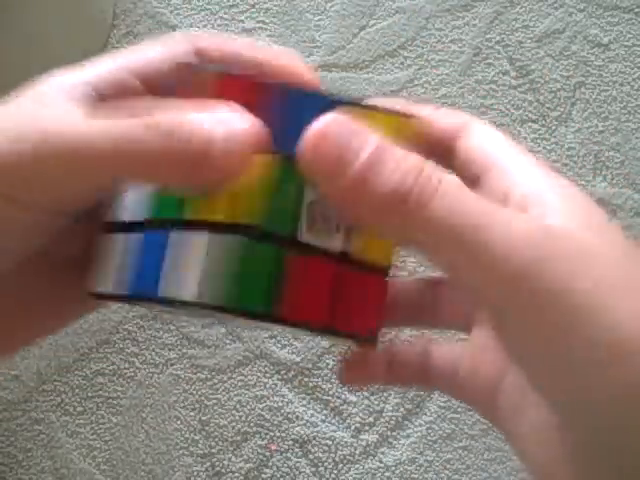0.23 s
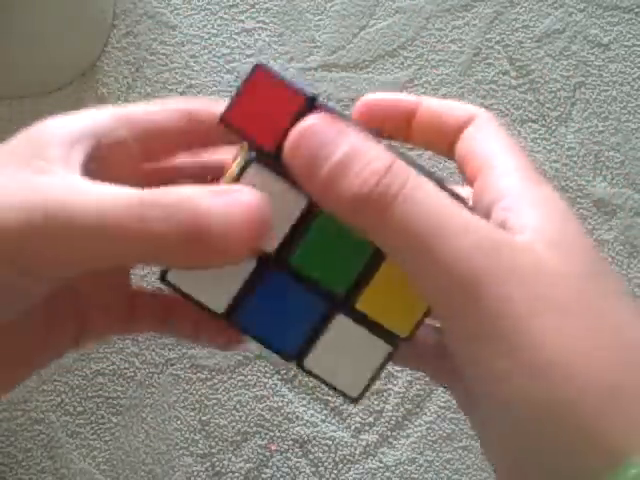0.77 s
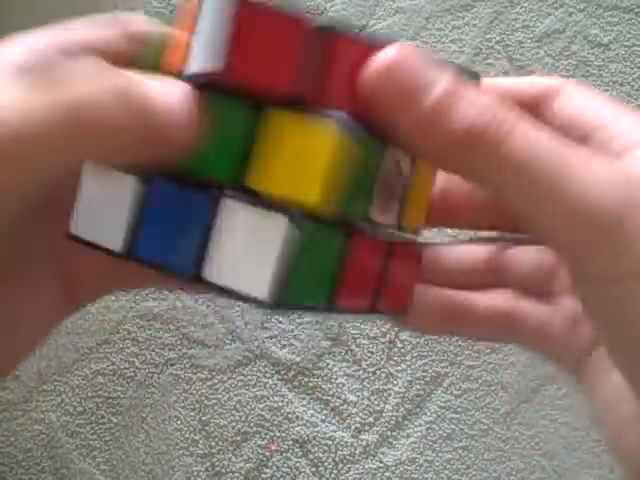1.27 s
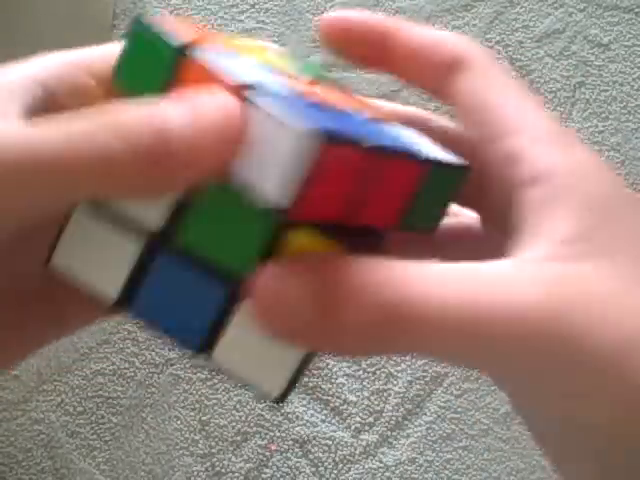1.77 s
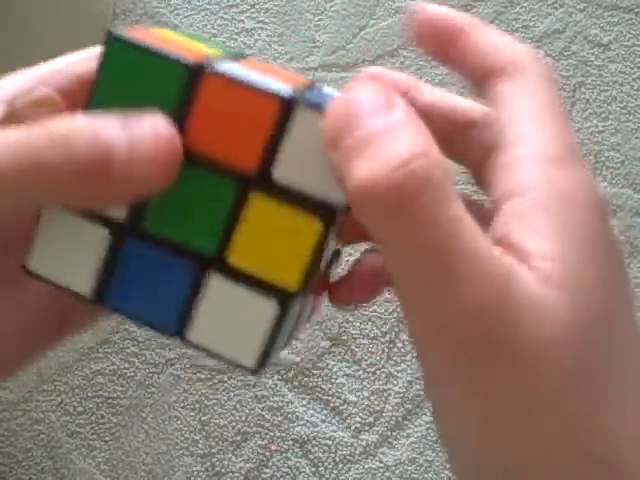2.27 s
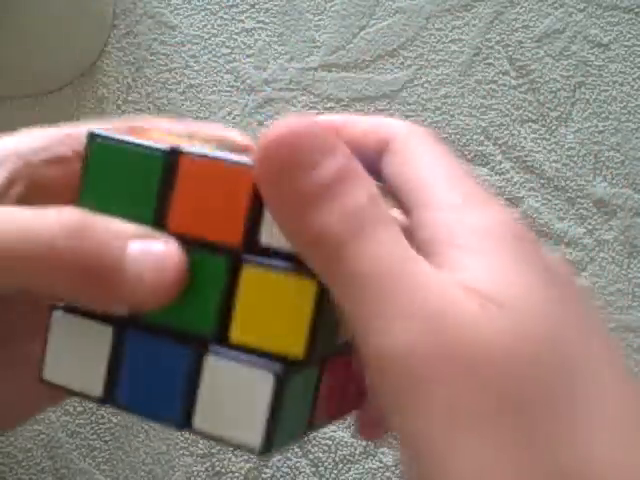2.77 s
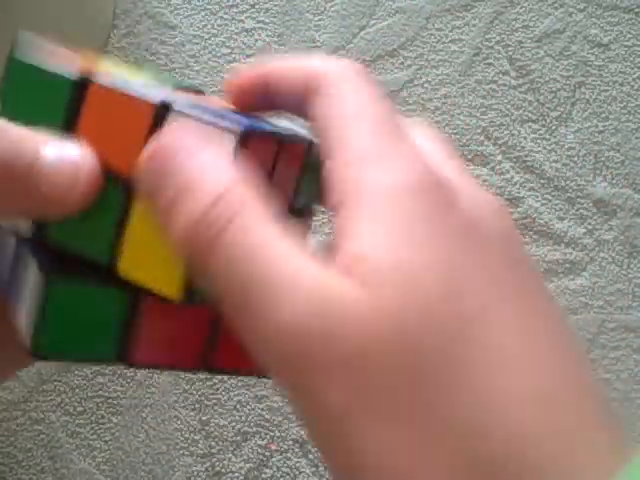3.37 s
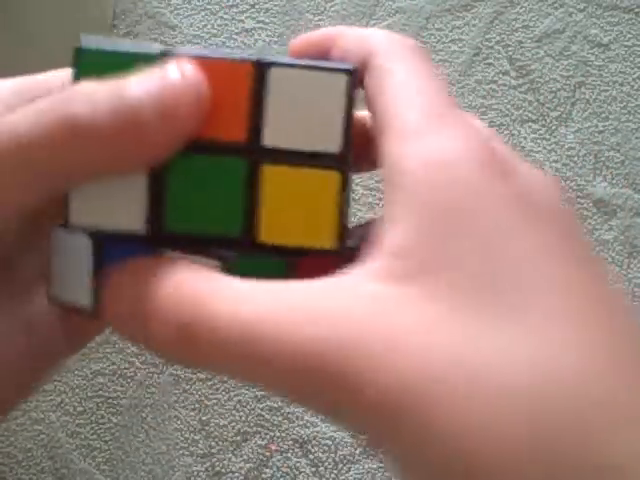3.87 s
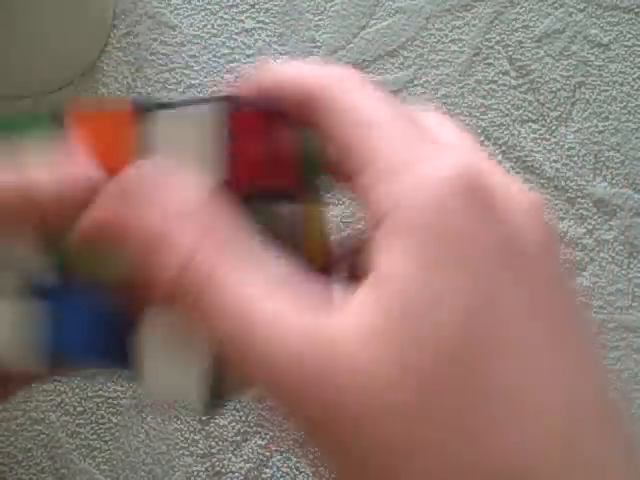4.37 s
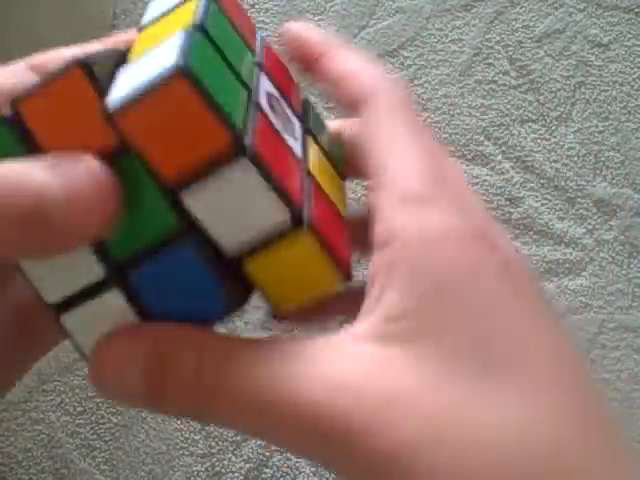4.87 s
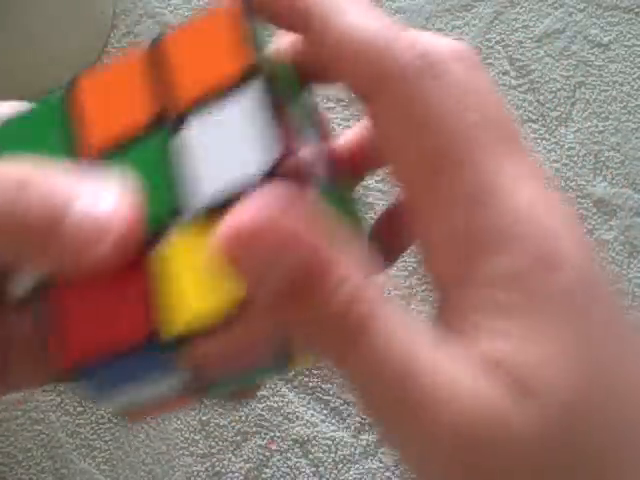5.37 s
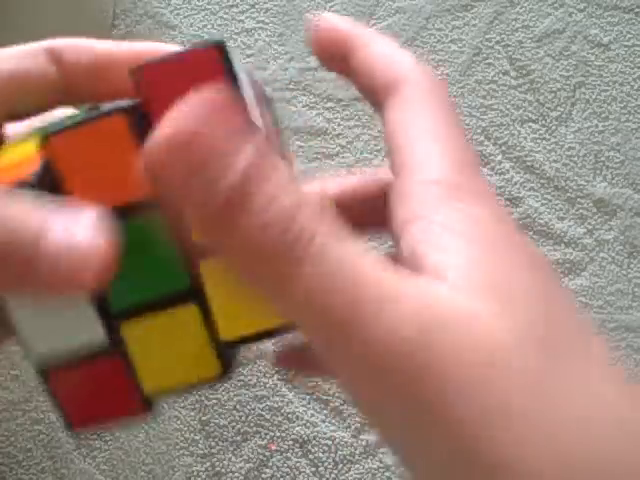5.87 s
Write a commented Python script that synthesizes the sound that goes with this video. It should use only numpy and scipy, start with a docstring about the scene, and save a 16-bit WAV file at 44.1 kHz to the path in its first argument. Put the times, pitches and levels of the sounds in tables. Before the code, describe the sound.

A plastic puzzle cube is twisted by hand close to a small microphone, with a soft room echo and a quiet, steady rumble and hiss. From the start, the layers scrape briefly and the hollow pieces click and clack in quick, uneven clusters. Between about 0.3 and 2.3 seconds there are faint, short high rings, probably from the springs, and a tiny squeak near 1 second. Busier runs of clicks come around 1.3 and 2.5 seconds. Pieces snap into place loudest at about 3.3, 4.6 and 5 seconds, with lighter clicking and scraping between. Just after 5 seconds, a faint, deep puff of air brushes the microphone. Another turn clatters near 5.7 seconds, and a few light clicks follow at about 6 seconds.

```python
"""Hands twist a plastic puzzle cube close to a small microphone, over a low rumble and hiss.
From the start, layers scrape as they turn and hollow pieces knock; the room answers softly.
From 0.3 s to about 2.3 s come high rings, likely the springs, and a short squeak near 0.95 s.
Pieces snap into place loudest near 3.3, 4.6 and 5 s. Just after that, stirred air brushes
the microphone, and a last turn clatters near 5.7 s."""
import sys
import numpy as np
from scipy import signal
from scipy.fft import rfft, irfft
from scipy.io import wavfile
from scipy.ndimage import uniform_filter1d

SR = 44100
rng = np.random.default_rng(int(sys.argv[2]) if len(sys.argv) > 2 else 0)


def transcribe(u):
    """Save the signal u as a 16-bit wav file named by the first command-line argument.

    u: samples, shape (n,) or (channels, n), limited to [-1, 1]; the rate is SR.
    q: integer samples, one column per channel.
    """
    v = np.clip(np.atleast_2d(u).T, -1, 1)
    q = np.round(v * 32767).astype(np.int16)
    wavfile.write(sys.argv[1], SR, q)


N = 269451

# how strong the steady background is at each pitch: pitch_hz, relative_db
BACKGROUND = [(12, -29), (20, 1.5), (77, 5), (189, -5), (244, -3), (305, -9), (690, -16.5),
              (1240, -22.5), (1900, -23.5), (3420, -26), (15200, -34), (16500, -54)]
# layers sliding round: start_s, end_s, first_db, last_db, sharp_db (added to those levels)
SCRAPES = [(0, 0.087, -44.5, -48, -12.5), (0.47, 0.57, -89, -74, -1), (0.921, 0.989, -65, -39.5, -12),
           (1.038, 1.27, -79, -74, -14), (1.251, 1.348, -62, -39, -10), (1.354, 1.447, -77, -73, 0),
           (2.168, 2.264, -63, -46.5, -10.5), (2.426, 2.554, -55, -73, -18),
           (2.585, 2.796, -80, -66.5, -16), (2.895, 2.983, -60.5, -53.5, -24),
           (3.244, 3.257, -50, -43.5, -2.5), (3.265, 3.429, -61, -57.5, -9.5), (3.928, 4.111, -61, -70, -6),
           (4.182, 4.34, -64.5, -75.5, -17), (4.406, 4.517, -43.5, -51, -9.5),
           (4.548, 4.659, -50, -45.5, -7.5), (4.977, 5.041, -65, -30.5, -12), (5.65, 5.703, -61, -49, -9),
           (5.72, 5.797, -32.5, -63, -12), (6.028, 6.104, -68, -61, -4)]
# the modes (natural ringing pitches) of the hollow pieces: pitch_hz, width_hz, level_db
PIECE_MODES = [(320, 210, 0), (888, 277, 10.5), (1160, 1340, 3), (1300, 110, 15), (2020, 3100, 23.5),
               (3500, 240, -1), (3500, 2200, 1), (4630, 2500, 10.5), (5080, 540, 5), (6850, 820, -1.5),
               (9000, 630, 5), (9400, 420, 5.5), (12100, 880, -1.5), (12030, 1100, -3), (15700, 1500, -7)]
# piece hitting piece: start_s, clack_db, hollow_db, sharp_db (both added to clack_db), edge_pitch_hz
KNOCKS = [(0.0036, -24, -20.5, 0, 6440), (0.0088, -19.5, -5.5, 3.5, 3650), (0.022, -41, 7, 1, 3500),
          (0.039, -33.5, 1, -14.5, 3600), (0.0534, -23.5, 1.5, -2.5, 3500), (0.17, -51.5, -10, -2, 4970),
          (0.225, -38.5, -9, -6, 9700), (0.3168, -22.5, -17, -4.5, 3700), (0.444, -55, -0.5, 1, 3620),
          (0.499, -47, -12, -34, 3300), (0.557, -64.5, 10, -19, 3300), (0.566, -57.5, -9, -13, 12000),
          (0.577, -62, -12, -14, 3300), (0.65, -63, -15, -20, 3330), (0.659, -57, -20, 8, 8550),
          (0.6877, -44.5, -21.5, -25.5, 3300), (0.6952, -50, -35, -28, 3300), (0.722, -63, -14, 3, 8000),
          (0.731, -47.5, -33, -5, 5800), (0.8401, -38.5, -34, -6, 4460), (0.9225, -45.5, -13, -2, 5970),
          (0.938, -51, -2, 9, 4120), (0.973, -38.5, 10, 9, 4440), (0.9828, -33, -17.5, -21, 3800),
          (1.0723, -44.5, -13, -15, 3420), (1.102, -53.5, -7, -25, 3400), (1.1247, -44.5, -10, -10.5, 3500),
          (1.1434, -50.5, -24, -18, 3300), (1.1715, -39.5, -4, -3, 4800), (1.2192, -45, -11, -18, 3300),
          (1.239, -54.5, 6, -3, 6700), (1.2688, -35.5, -12, -8, 3300), (1.281, -30.5, -1.5, -9.5, 6960),
          (1.3014, -43.5, -2, 7.5, 7000), (1.314, -43, 2, -3, 4500), (1.328, -22.5, -3.5, 3, 7600),
          (1.3438, -35, 1, -9.5, 4500), (1.378, -41, 3, -7, 4500), (1.3823, -35, -0.5, -2, 4830),
          (1.4024, -44, 0, 3, 4000), (1.4194, -32, -21, 6.5, 8440), (1.4297, -28.5, -4, 12.5, 3800),
          (1.5167, -48.5, 4, 1.5, 6700), (1.5412, -36.5, -13.5, -1, 4140), (1.742, -46.5, -4, -14, 4040),
          (1.762, -65, -14, 11, 5000), (1.9421, -44.5, -5, 4, 3880), (1.979, -42.5, -13, 2, 4260),
          (2.0858, -31, -18.5, 4.5, 3700), (2.1705, -29, -24, -2.5, 4340), (2.199, -50, 3.5, -15, 5400),
          (2.2194, -50.5, 7, 11, 7100), (2.2352, -42.5, 3, 3, 4940), (2.2426, -33.5, -2, -2, 4870),
          (2.253, -36, -12, -11, 4400), (2.3137, -38, -30, -4, 5800), (2.354, -47, -13, 4.5, 7350),
          (2.437, -42, 0, -3, 3300), (2.441, -38, 2, -4.5, 3600), (2.454, -48, -11, -2, 4500),
          (2.481, -39.5, -6, -2, 4500), (2.497, -19, -20, -7, 6500), (2.5169, -47.5, 13, -11, 3300),
          (2.5294, -26.5, -6.5, 3, 3100), (2.5909, -36, 2.5, -4.5, 4730), (2.61, -56, -6, 4, 8050),
          (2.628, -42, -14, -11, 3770), (2.675, -47, 2, 0, 4500), (2.7337, -56.5, 4.5, -20, 4200),
          (2.7531, -44.5, -2, -13.5, 3800), (2.757, -42.5, -2, -32, 3300),
          (2.7713, -39.5, -11.5, -12.5, 3340), (2.8157, -43, 2, -7, 3400),
          (2.8981, -41.5, -13.5, 3.5, 5200), (2.9218, -32, -13.5, -5, 7500), (2.935, -45.5, -2, -4, 3900),
          (2.96, -36, -10, -4, 3300), (3.0158, -36, -10, -6.5, 4650), (3.142, -54.5, -6, -8.5, 3800),
          (3.227, -42, -5, -2.5, 3900), (3.2537, -4.5, -29, -5.5, 7600), (3.274, -36.5, -9, 5.5, 3900),
          (3.314, -39.5, -6, 5, 9400), (3.334, -35, -3, -8, 3400), (3.3729, -39, -8, -0.5, 4600),
          (3.383, -30, -13, 3.5, 3280), (3.3874, -21.5, -35, -14, 3700), (3.4185, -32.5, -9, -0.5, 7850),
          (3.438, -29, -3.5, 5, 4500), (3.4525, -47, 6, -8, 3500), (3.472, -39.5, -23, -13.5, 5100),
          (3.5443, -34.5, -6.5, -2, 3800), (3.8024, -49, -7, -27, 3220), (3.816, -61, 2, -16, 3500),
          (3.8388, -44, -1.5, -1, 7020), (3.9293, -43, 1, 3, 5640), (3.963, -48.5, 8, -13, 4400),
          (4.0118, -52.5, -1, -18, 3300), (4.0413, -54, 6.5, -21, 3230), (4.188, -40, -4, 0.5, 5880),
          (4.2025, -40.5, 1, -7, 3290), (4.223, -38.5, -5.5, -10.5, 3300), (4.241, -48, -5.5, -10.5, 3360),
          (4.2665, -44, -3, -3, 3400), (4.2841, -41.5, -1, -11, 4800), (4.302, -37.5, -8.5, -13.5, 3500),
          (4.3153, -49, 4.5, -10, 3330), (4.408, -32, -3.5, -6.5, 3340), (4.4204, -27, -6, 5, 12200),
          (4.433, -31.5, 1, -3, 4500), (4.4456, -26.5, -8.5, -5.5, 4100), (4.4775, -37, -3, 0, 7100),
          (4.4883, -28, -5.5, -13.5, 4830), (4.552, -49, -4.5, -3, 4500), (4.568, -21.5, 5, -4, 6740),
          (4.59, -40, 1.5, 0.5, 5230), (4.6002, -23, -6.5, -4.5, 5970), (4.6021, -7, -9.5, 0.5, 6000),
          (4.62, -25.5, -4.5, 1, 3700), (4.6235, -15.5, -17.5, -6.5, 4500), (4.627, -23.5, -6, -1, 5440),
          (4.6365, -25, -3.5, -3.5, 7550), (4.646, -35.5, -9, 1, 4000), (4.709, -43.5, 5.5, -5, 11900),
          (4.794, -37, -20.5, 1, 4500), (4.912, -54, -1.5, -8, 3280), (4.922, -55.5, 0.5, -7.5, 3500),
          (4.9582, -37.5, 0, 1.5, 3800), (4.962, -42.5, -5, 0, 3500), (4.9868, -31.5, -5, -7, 7650),
          (5.01, -22.5, -8.5, 4, 3230), (5.018, -12, -6, 3.5, 3420), (5.0358, -22.5, -16.5, -12.5, 3280),
          (5.185, -47, 0.5, 15.5, 8600), (5.2664, -54, -18, -23, 9030), (5.299, -63.5, -10, 3, 8000),
          (5.392, -48, -8, -6, 3500), (5.398, -35.5, -16, 0.5, 3500), (5.42, -63, -14, -2, 7020),
          (5.592, -68, -15, 12, 8000), (5.606, -53.5, -2, 0.5, 4000), (5.6513, -45, 6.5, 4, 7250),
          (5.667, -57.5, 19, -18, 4200), (5.6795, -47, 7, -9, 3300), (5.6867, -48.5, 15, -9, 3300),
          (5.7033, -30, -3, -3, 4600), (5.709, -25.5, -32, 1.5, 6340), (5.7248, -26, -15, -1, 3080),
          (5.741, -36, -3, 3, 13400), (5.756, -39, -23, -8, 3300), (5.7605, -35.5, -14, 0, 3300),
          (5.7671, -28.5, -6.5, -7, 6800), (5.7805, -38.5, 0, -6, 4300), (5.855, -43.5, -9, -4, 3280),
          (5.928, -50, -29, -19, 3300), (6.0224, -37.5, -8, -15, 3350), (6.071, -41, -12.5, -30.5, 3320),
          (6.083, -47.5, 4.5, -7, 5540)]
# the room's echoes: pitch_hz, fade_s (time to fall 60 dB), relative_db
ECHOES = [(250, 0.7, 1.5), (1490, 0.31, -1), (5000, 0.26, -2), (14000, 0.16, -4)]
# thin tones: a short squeak near 0.95 s, and high rings, likely the springs:
# start_s, pitch_hz, level_db, fade_s (time to fall 60 dB)
THIN_TONES = [(.32, 5180, -51.5, 0.16), (0.944, 2710, -46, 0.044), (0.949, 7040, -48, 0.064),
              (.985, 5170, -45, 0.11), (1.268, 5120, -52, .06), (1.272, 7300, -52, 0.087),
              (1.435, 8500, -57, 0.071), (2.18, 5200, -57, 0.091), (2.18, 7150, -52, 0.046),
              (2.18, 10400, -60, 0.038), (2.235, 5010, -45, 0.047), (2.25, 5100, -60, 0.099),
              (2.25, 4540, -60, 0.13)]
# air stirred past the microphone: time_s, level_db
DRAUGHT = [(4.95, -65), (5.124, -44), (5.45, -83)]
# where a tap's five parts (thud, hollow, clack, snap, tick) meet: border_hz
PART_BORDERS = [500, 1300, 3200, 7500]

TAP_SAMPLES, LEAD_SAMPLES = 2048, 128  # length of one tap; the quiet at its front
TAP_HZ = np.fft.rfftfreq(TAP_SAMPLES, 1 / SR)  # the pitches in a tap's spectrum


def undb(db):
    """Turn decibels into a number to multiply by."""
    return 10 ** (np.asarray(db) / 20)


def unit(x):
    """Scale a sound so its average strength (rms) is 1."""
    return x / np.sqrt(np.mean(x ** 2))


def band(x, low_hz, high_hz):
    """Keep the pitches between two limits."""
    return signal.sosfilt(signal.butter(2, [low_hz, high_hz], "band", fs=SR, output="sos"), x)


def place(sounds, starts_s):
    """Lay short sounds on the time line."""
    out = np.zeros(N + sounds.shape[1])
    for sound, start_s in zip(sounds, starts_s):
        first = int(start_s * SR)
        out[first:first + len(sound)] += sound
    return out[:N]


def resonance(hz, width_hz):
    """Spectrum of something that rings most strongly at one pitch."""
    return 1j * TAP_HZ * width_hz / (hz ** 2 - TAP_HZ ** 2 + 1j * TAP_HZ * width_hz)


def background():
    """Low rumble and microphone hiss: steady noise, strongest in the bass."""
    hz, db = np.transpose(BACKGROUND)
    pitches = np.fft.rfftfreq(N, 1 / SR) + 1
    colour = undb(np.interp(np.log(pitches), np.log(hz), db))
    return unit(irfft(rfft(rng.standard_normal(N)) * colour, N)) * undb(-58)


def piece_rings(count, detune, scatter_db):
    """Spectra of a tap's five parts, low to high; each tapped piece can be tuned a little apart."""
    centre, width, db = np.transpose(PIECE_MODES)[:, :, None]
    width = np.maximum(width, centre / 8)  # plastic in the hand never rings long
    chance = rng.standard_normal((count, 2, len(PIECE_MODES), 1))
    hz = centre * (1 + detune * chance[:, 0])
    sign = (-1.) ** np.arange(len(PIECE_MODES))[:, None]  # neighbouring modes push out and in by turns
    modes = sign * undb(db + scatter_db * chance[:, 1]) * resonance(hz, width)
    modes *= (1j * TAP_HZ / (hz * .5 + 1j * TAP_HZ)) ** 2  # small pieces give off little bass
    modes *= hz * 2 / (hz * 2 + 1j * TAP_HZ)  # a soft contact passes little treble
    part = np.digitize(centre[:, 0], PART_BORDERS)
    return [modes[:, part == k].sum(axis=1) for k in range(len(PART_BORDERS) + 1)]


def scrapes():
    """Plastic faces stick and slip: tiny uneven taps ring the pieces, over a smooth high rub."""
    t, level, sharp_level = np.arange(N) / SR, np.zeros(N), np.zeros(N)
    for start_s, end_s, first_db, last_db, sharp_db in SCRAPES:
        on = (t >= start_s) & (t < end_s)
        gain = undb(np.interp(t[on], [start_s, end_s], [first_db, last_db]))
        level[on] += gain
        sharp_level[on] += gain * undb(sharp_db)
    grip_db = 8.7 * np.minimum(rng.exponential(size=N // 96 + 1), 2.7)  # a new grip about every 2 ms
    taps = rng.standard_normal(N) * uniform_filter1d(undb(grip_db).repeat(96)[:N], size=32)
    rings = piece_rings(1, detune=0, scatter_db=0)
    _, hollow, clack, snap, tick = (unit(signal.fftconvolve(taps, irfft(r[0]))[:N]) for r in rings)
    rub = unit(band(rng.standard_normal(N), 4100, 11000))
    body = uniform_filter1d(level, size=256) * (clack + undb(-1.5) * hollow + undb(-10.5) * snap)
    return body + uniform_filter1d(sharp_level, size=256) * (tick + undb(-2) * rub)


def rattles(hollow_db, sharp_db):
    """Spectrum of the contacts inside each knock: a tiny rattle that builds and fades."""
    # flat faces meeting sound hollow and rattle longer than a corner catching
    rattle_ms = 0.72 * np.exp(0.012 * hollow_db - 0.02 * sharp_db)
    time_ms = np.maximum(np.arange(TAP_SAMPLES // 2) - LEAD_SAMPLES, 0) / SR * 1000
    age = time_ms / rattle_ms
    contacts = rng.standard_normal(age.shape)
    firm = np.diff(np.sign(age - 1), append=1) > 0  # one firm contact as age passes 1
    contacts[:, LEAD_SAMPLES:] += 3.55 * firm[:, LEAD_SAMPLES:]
    spiky = contacts * np.abs(contacts) ** .5
    spectrum = rfft(spiky * age ** 1.71 * np.exp(-age), TAP_SAMPLES)
    # hard, brief contacts push all pitches alike, so even out the spectrum
    return spectrum / np.sqrt(uniform_filter1d(np.abs(spectrum) ** 2, size=27))


def knocks():
    """Rattles set the pieces ringing. Gives the sound at the microphone and the sound sent all round."""
    start_s, clack_db, hollow_db, sharp_db, edge_hz = np.transpose(KNOCKS)[:, :, None]
    rattle = rattles(hollow_db, sharp_db)
    thud, hollow, clack, snap, tick = piece_rings(len(KNOCKS), detune=.02, scatter_db=2.0)
    strength = lambda ring: np.sqrt(np.mean(np.abs(ring) ** 2, axis=1, keepdims=True))
    sharp = snap / strength(snap) + undb(-5) * tick / strength(tick)
    clack = clack / (1 + 1j * TAP_HZ / 5000) ** 2  # fades above 5000 Hz
    light_touch_db, thud_db = -32, -22.5  # the whole cube thuds in the hands, softer than the clack
    # blows harder than a light touch shake more pieces
    force_db = np.maximum(clack_db + np.maximum(sharp_db, 0) - light_touch_db, 0)
    other_modes = undb(-10 + 0.4 * force_db)
    edge = other_modes + resonance(edge_hz, 0.28 * edge_hz)
    # the air space in the struck piece rings lower for hollower knocks
    cavity_hz = 1648 * np.exp(-0.0083 * hollow_db + 0.065 * rng.standard_normal(start_s.shape))
    cavity = other_modes + resonance(cavity_hz, 0.3 * cavity_hz)
    heard = []
    # the microphone faces one cavity and edge; the walls hear all sides of the cube at once
    for rings in ((thud, hollow, clack * cavity, sharp * edge), (thud, hollow, clack, sharp)):
        sound = 0
        for ring, db in zip(rings, (thud_db, hollow_db, 0, sharp_db)):
            part = irfft(ring * rattle)
            peak = np.sqrt(2 * uniform_filter1d(part ** 2, size=64).max(axis=1, keepdims=True))
            sound = sound + undb(clack_db + db) * part / peak
        heard.append(place(sound, np.maximum(start_s[:, 0] - LEAD_SAMPLES / SR, 0)))
    return heard


def room(x):
    """The walls send back dense, soft echoes; each octave dies away at its own rate."""
    t = np.arange(SR // 2) / SR
    hz, fades, levels = np.transpose(ECHOES)
    tail = 0
    for low_hz in 125 * 2. ** np.arange(7):
        middle_hz = np.sqrt(2) * low_hz
        fade_s, db = (np.interp(np.log(middle_hz), np.log(hz), column) for column in (fades, levels))
        tail = tail + band(rng.standard_normal(len(t)), low_hz, 2 * low_hz) * undb(db - 60 * t / fade_s)
    tail *= np.clip(t / 0.0035, 0, 1) ** 2  # echoes gather over the first 3.5 ms
    return signal.fftconvolve(x, tail / np.sqrt(np.sum(tail ** 2)))[:N] * undb(-18.5)


def thin_tones():
    """A short squeak, and high rings, likely the springs; each rises fast, wavers and soon dies."""
    start_s, hz, db, fade_s = np.transpose(THIN_TONES)[:, :, None]
    t = np.arange(SR // 2) / SR
    waver = unit(uniform_filter1d(rng.standard_normal((len(THIN_TONES), len(t))), size=200))
    tone = np.sin(2 * np.pi * hz * t + 0.3 * waver)
    rise = 1 - np.exp(-t / 0.00071)
    fall = undb(db - 60 * (t / fade_s) ** 2)
    return place(tone * rise * fall, start_s[:, 0])


def draught():
    """Air stirred past the microphone makes a brief swell in the deep bass."""
    time_s, db = np.transpose(DRAUGHT)
    swell = undb(np.interp(np.arange(N) / SR, time_s, db))
    return unit(band(rng.standard_normal(N), 19, 35)) * swell


def scene():
    """Add the cube, its echoes and the background into one channel."""
    near, all_round = knocks()
    turning = scrapes() + thin_tones()
    return (near + turning + room(all_round + turning) + background() + draught())[None]


def record(dry):
    """The microphone thins the deepest bass; the recorder rounds loud peaks and cuts the top treble."""
    bass_hz, ceiling, shelf_hz, top_hz = 24, 0.9, 15800, 16650
    x = signal.sosfilt(signal.butter(2, bass_hz, "high", fs=SR, output="sos"), dry)
    x = ceiling * np.tanh(x / ceiling)
    x = signal.sosfilt(signal.ellip(6, .2, 18, shelf_hz, fs=SR, output="sos"), x)  # 18 dB down
    return signal.sosfilt(signal.ellip(10, .2, 70, top_hz, fs=SR, output="sos"), x)  # 70 dB more


dry = scene()
out = record(dry)
transcribe(out)
```